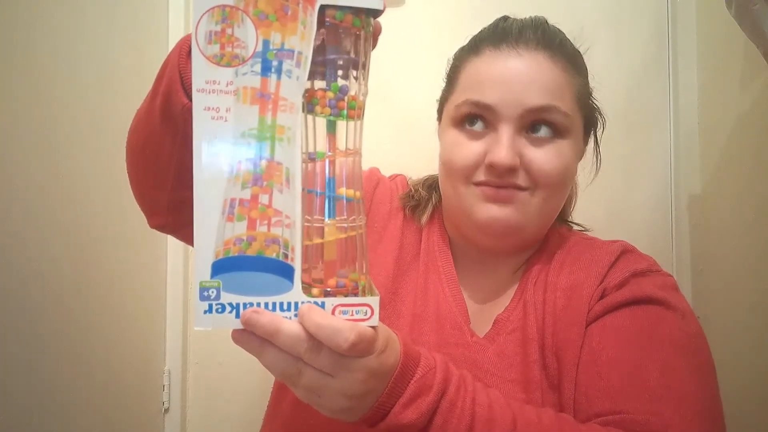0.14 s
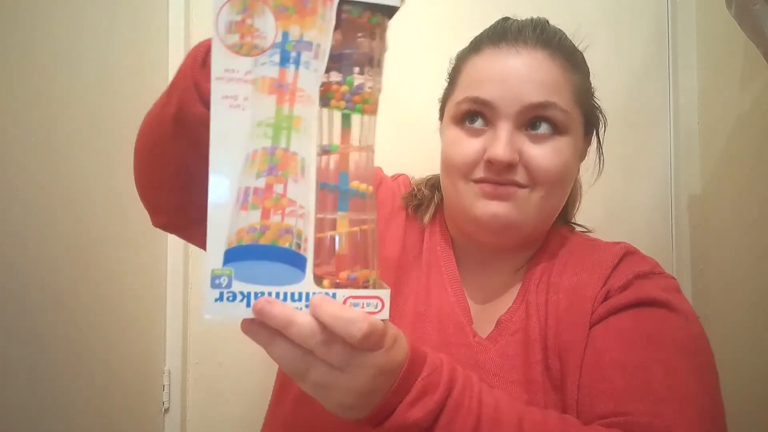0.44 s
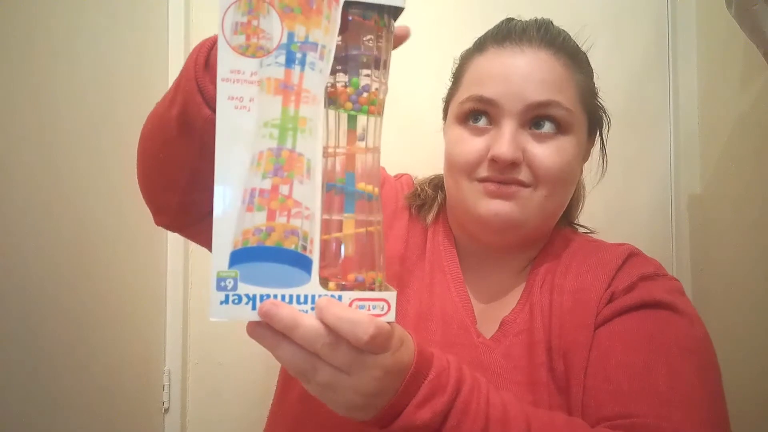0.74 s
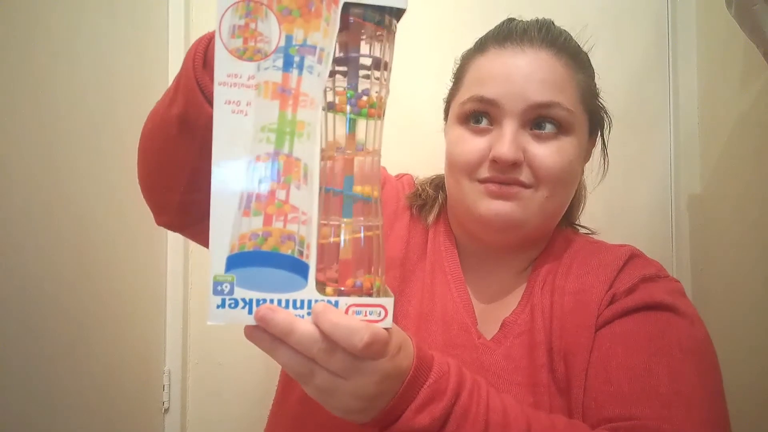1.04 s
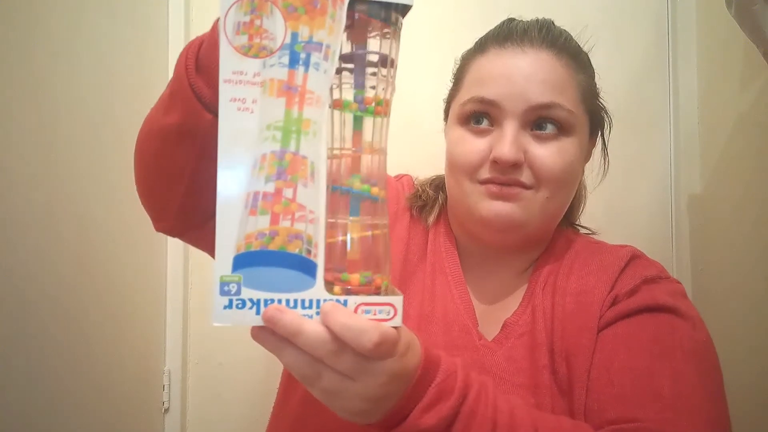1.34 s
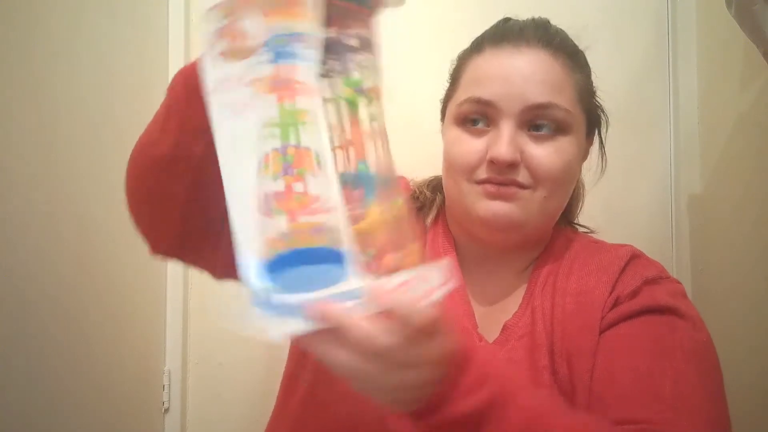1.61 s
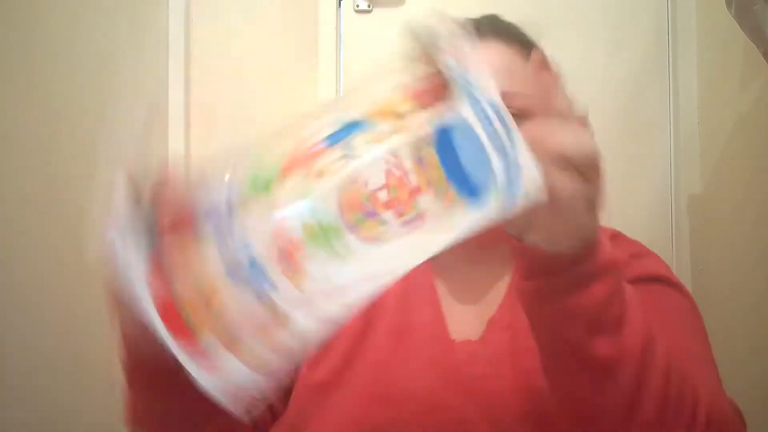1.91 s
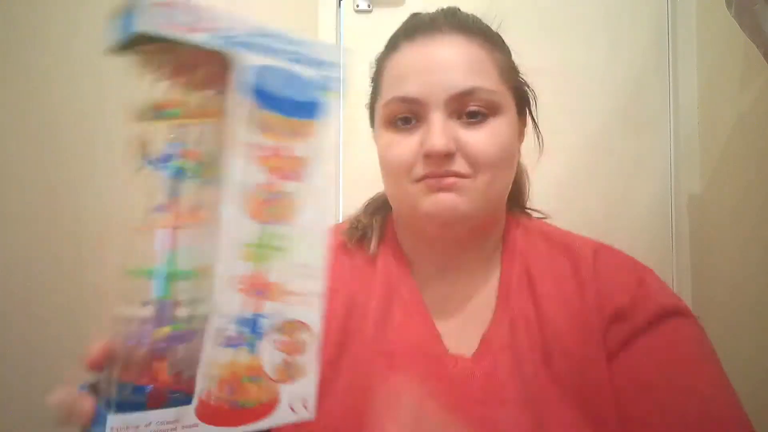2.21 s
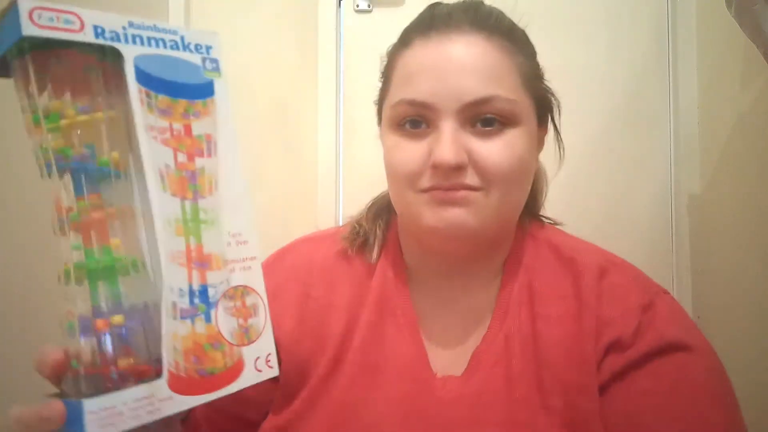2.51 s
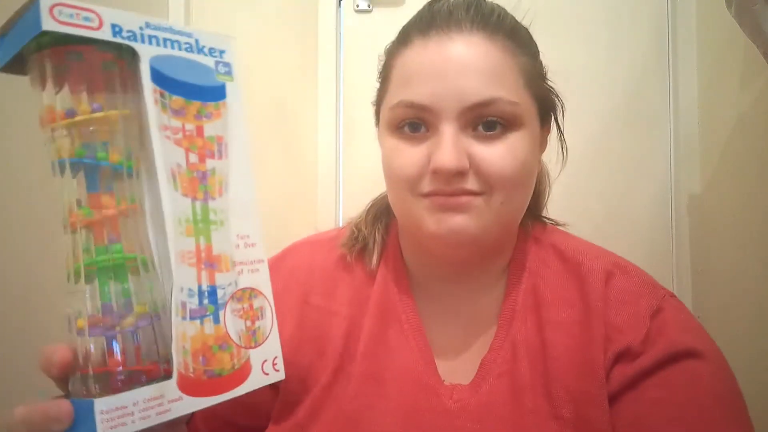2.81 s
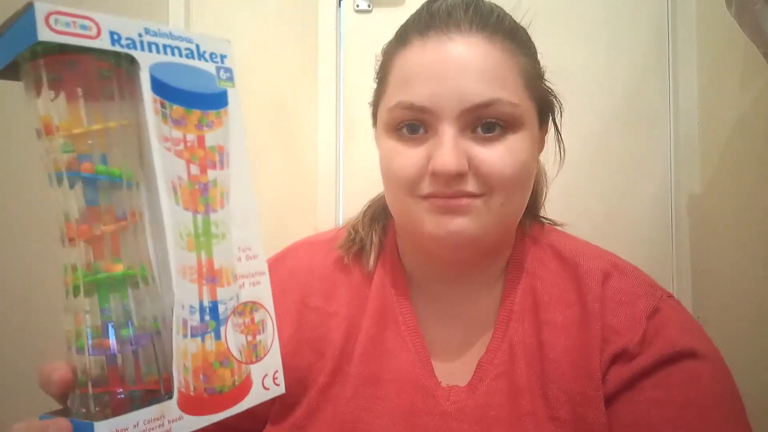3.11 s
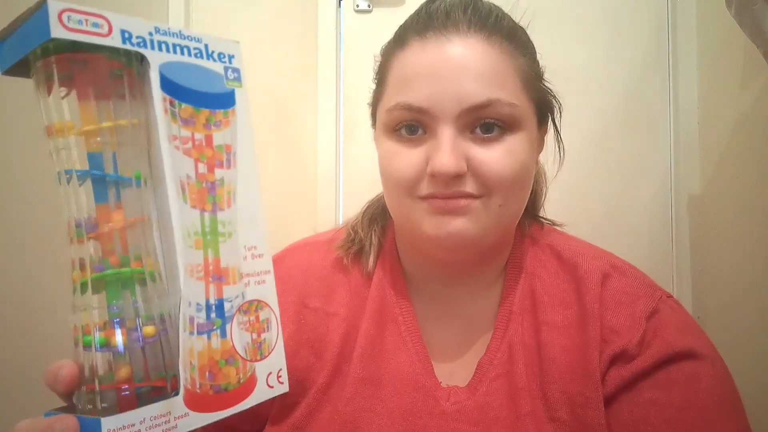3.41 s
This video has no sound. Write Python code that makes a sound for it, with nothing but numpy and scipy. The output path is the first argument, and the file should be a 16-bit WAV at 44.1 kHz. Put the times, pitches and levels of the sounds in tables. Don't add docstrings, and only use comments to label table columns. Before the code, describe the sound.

A bead-filled rain tube rattles close by, trickling, then pouring brightly after being turned over

```python
import sys
import numpy as np
from scipy import signal
from scipy.fft import rfft, irfft
from scipy.io import wavfile

SR = 44100
rng = np.random.default_rng(int(sys.argv[2]) if len(sys.argv) > 2 else 0)


def transcribe(signal):
    frames = np.atleast_2d(signal).T
    limited = np.clip(frames, -1, 1)
    pcm = np.round(limited * 32767).astype(np.int16)
    wavfile.write(sys.argv[1], SR, pcm)


def voltage_ratio(decibels):
    exponent = np.asarray(decibels, float) / 20
    return 10 ** exponent


N = 156555
TIME_S = np.arange(N) / SR


def rms_one(x):
    return x / np.sqrt(np.mean(x ** 2) + 1e-20)


def at_hz(points, hz):
    table_hz, table_db = np.array(points).T
    return np.interp(np.log(hz), np.log(table_hz), table_db)


def drift(rate_hz):
    r = np.exp(-40 * np.pi * rate_hz / SR)
    noise = rng.standard_normal(N // 20 + 2002)
    slow = signal.lfilter([1], [1, -2 * r, r * r], noise)[2000:]
    return np.interp(np.arange(N) / 20, np.arange(len(slow)), rms_one(slow))


def coloured(spectrum):
    hz = np.maximum(np.fft.rfftfreq(N, 1 / SR), 1)
    shape = voltage_ratio(at_hz(spectrum, hz)) * (hz > 15)
    return rms_one(irfft(rfft(rng.standard_normal(N)) * shape, N))


def ring(clicks, hz, t60_s):
    r, w = voltage_ratio(-60 / (t60_s * SR)), 2 * np.pi * min(hz, .45 * SR) / SR
    return signal.lfilter([0, np.sin(w)], [1, -2 * r * np.cos(w), r * r], clicks + 1e-18)


def even_ring(clicks, hz, width_hz):
    r, w = np.exp(-np.pi * width_hz / SR), 2 * np.pi * min(hz, .45 * SR) / SR
    stage = [(1 - r * r) / 2, 0, -(1 - r * r) / 2, 1, -2 * r * np.cos(w), r * r]
    return signal.sosfilt([stage, stage], clicks + 1e-18)


def strikes(rows, extra_db):
    s, db = np.transpose(rows)
    out = np.zeros(N)
    out[(s * SR).astype(int)] = voltage_ratio(db + extra_db)
    return out


def grains(mean_rate, clump, spread_db):
    mean_rate = np.clip(mean_rate, 150, SR / 2)
    size_db = spread_db * np.minimum(rng.exponential(1, N), 4)
    sizes = rms_one(voltage_ratio(size_db) * rng.choice([-1, 1], N))
    lands = rng.random(N) < mean_rate * clump / SR
    return lands * sizes * np.sqrt(SR / mean_rate)


# frequency in Hz, density in dB per Hz.
RUMBLE_SPECTRUM = [(11, -33), (18, -3), (45, 0), (76, -7), (232, -14), (300, -18.5), (390, -71),
                   (660, -120)]
# frequency in Hz, density in dB per Hz.
HISS_SPECTRUM = [(180, -47), (300, -3.5), (439, -3), (517, -13.5), (953, -9.5), (1220, -16), (2740, -18),
                 (2980, -22), (15500, -34)]


def room_floor():
    rumble = voltage_ratio(-48 + 2.5 * drift(4)) * coloured(RUMBLE_SPECTRUM)
    return rumble + voltage_ratio(-52) * coloured(HISS_SPECTRUM)


def room_echo(x):
    t60_s, treble_t60_s, treble_hz, delay_s = .3, .25, 8700, .003
    t = np.arange(SR // 2) / SR
    lowpass = signal.butter(2, treble_hz, fs=SR, output="sos")
    out = 0
    for k in range(10):
        noise = rng.standard_normal(len(t)) * np.clip(t / delay_s - 1, 0, 1)
        low = signal.sosfilt(lowpass, noise)
        tail = low * voltage_ratio(-60 * t / t60_s) + (noise - low) * voltage_ratio(-60 * t / treble_t60_s)
        tail = tail / np.sqrt(np.sum(tail ** 2))
        share = np.cos(np.pi / 2 * np.clip(np.arange(N) / N * 9 - k, -1, 1))
        out = out + signal.fftconvolve(x * share, tail)[:N]
    return out


def knock_burst():
    start_s, length_s = .34, .02
    swell = np.exp(-((TIME_S - start_s) / length_s) ** 2)
    return voltage_ratio(-40) * even_ring(swell * rng.standard_normal(N), 1500, 3400)


def carton_thump():
    return ring(strikes([(2.325, -24.5)], 0), 60, .054)


# start in seconds, peak in dB, own pitch in Hz.
HAND_KNOCKS = [
    (.13, -36.5, 760),
    (.335, -43.5, 910),
    (.408, -56, 800),
    (.44, -34, 470),
    (.696, -25, 490),
    (1.001, -32.5, 800),
    (1.053, -30, 800),
    (1.199, -31, 776),
    (1.632, -25, 382),
    (2.024, -32.5, 770),
]
# frequency in Hz, level in dB, width in Hz.
CARTON_MODES = [
    (470, -19, 73),
    (704, 0.5, 270),
    (994, 15.5, 250),
    (1232, 10.5, 430),
]


def carton_knocks():
    knock_db, own_pitch_db, scatter_db = 23, 12, 2.6
    times = [row[:2] for row in HAND_KNOCKS]
    out = np.zeros(N)
    for hz, db, width_hz in CARTON_MODES:
        uneven = voltage_ratio(rng.normal(0, scatter_db, N))
        out += even_ring(strikes(times, knock_db + db) * uneven, hz, width_hz)
    for s, db, hz in HAND_KNOCKS:
        out += even_ring(strikes([(s, db)], knock_db + own_pitch_db), hz, 80)
    return out


# start in seconds, peak in dB, ring in Hz.
HARD_LANDINGS = [(0.0644, -22, 6270), (0.0827, -12, 4600), (0.1474, -25, 4600), (0.1574, -24, 4570),
                 (0.378, -31, 4830), (0.4045, -17, 4880), (0.4294, -17, 4820), (0.4786, -12.5, 5060),
                 (0.4874, -13, 4900), (0.5074, -15, 4670), (0.541, -9.5, 4840), (0.5524, -17, 5140),
                 (0.5634, -18, 4700), (0.629, -10, 4880), (0.6749, -9, 7370), (0.7264, -11, 4700),
                 (0.7657, -18, 4960), (0.7844, -10, 7140), (0.8101, -8, 6900), (0.8924, -10, 7500),
                 (0.9263, -8, 5000), (1.012, -9, 5080), (1.0244, -9, 5310), (1.0514, -6, 6600),
                 (1.0834, -17, 4910), (1.1164, -4.5, 4780), (1.1394, -11, 5000), (1.3194, -7, 4810),
                 (1.6594, -10, 5800), (2.0453, -1.5, 5370)]


def hard_beads():
    bounce_s, bounce_loss_db, hard_db, click_db = .0045, 4, 29, -34
    width_hz, partner = 230, 1.035
    bounce = np.arange(3)
    out = np.zeros(N)
    for s, db, hz in HARD_LANDINGS:
        gaps = rng.uniform(.6, 1.0, 3)
        push = np.zeros(SR // 20)
        push[(bounce_s * SR * bounce * gaps).astype(int)] = voltage_ratio(db + hard_db - bounce_loss_db * bounce)
        wall = even_ring(push, hz, width_hz) + even_ring(push, hz * partner, width_hz)
        click = voltage_ratio(click_db) * even_ring(push, 8000, 9000)
        i = int(s * SR)
        out[i:i + len(push)] += wall + click
    return out


# time in seconds, flow level in dB,
# free ticks against wall hits in dB, carton ring left by the grip in dB.
LAST_FALL = [
    (0.0, -24.5, -5.5, -3),
    (0.042, -47, 5, -2),
    (0.092, -22, 1.5, -9),
    (0.144, -44, 1, 0),
    (0.15, -35, 7.5, -5),
    (0.176, -44, 7, 6),
    (0.18, -87, -12, 0),
    (0.37, -51, -2, -6),
]
# time in seconds, flow level in dB,
# free ticks against wall hits in dB, carton ring left by the grip in dB.
POUR_FLOW = [(0.37, -59, -4, -9), (0.4, -32, -6, -0.5), (0.57, -27, 3, 0), (0.59, -26.5, -1, 1.5),
             (0.82, -23.5, 0.5, 2.5), (1.64, -18, -1, 4), (1.66, -15.5, 0, -5), (1.74, -20, 0.5, 1),
             (1.88, -18, 2, -4.5), (1.92, -24.5, 0.5, 3), (2.06, -16, -1.5, 3.5), (2.35, -11.5, 4, -2.5),
             (2.72, -13.5, 3, 3), (2.74, -11.5, 2, 2), (3.55, -14.5, 2.5, 0.5)]


def bead_flow():
    s, *controls = np.transpose(LAST_FALL + POUR_FLOW)
    flow_db, free_db, grip_db = [np.interp(TIME_S, s, c) for c in controls]
    flow_db = flow_db + 1 * drift(8)
    more = voltage_ratio(.6 * (flow_db + 18.5))
    clump = voltage_ratio(1.8 * drift(50))
    free_ticks = grains(12000 * more, clump, 3) * voltage_ratio(free_db + flow_db)
    wall_hits = grains(1500 * more, clump, 1) * voltage_ratio(flow_db)
    return wall_hits, free_ticks, grip_db


def turned_over():
    turn_s, turn_length_s = 2.2, .25
    return np.clip((TIME_S - turn_s) / turn_length_s + .5, 0, 1)


def shaken_cap(wall_hits):
    shaken = wall_hits * (TIME_S > .08) * (TIME_S < .3)
    return voltage_ratio(8) * even_ring(shaken, 11600, 675)


# frequency in Hz, density in dB per Hz.
TICK_COLOUR_BEFORE = [(150, -55), (250, -86), (526, -10.5), (782, -20), (1250, -14.5), (2670, -7),
                      (4800, 1), (11200, 1.5), (15500, -22)]
# frequency in Hz, density in dB per Hz.
TICK_COLOUR_AFTER = [(150, -65), (250, -39.5), (769, -12.5), (1510, -15), (1990, -26), (2710, -10.5),
                     (5050, 0.5), (11200, -2), (15500, -20.5)]


def bare_ticks(free_ticks, turned):
    tick_q = 6.06
    dealt = rng.integers(0, 12, N)
    out = 0
    for k, hz in enumerate(np.geomspace(300, 15000, num=36)):
        before_db, after_db = at_hz(TICK_COLOUR_BEFORE, hz), at_hz(TICK_COLOUR_AFTER, hz)
        colour_db = before_db * (1 - turned) + after_db * turned
        out = out + even_ring(free_ticks * (dealt == k % 12) * voltage_ratio(colour_db), hz, hz / tick_q)
    return voltage_ratio(10.5) * out


# frequency in Hz, width in Hz,
# level in dB before the turn, level in dB after it.
TUBE_MODES = [(385, 50, -28, -22), (790, 71, -3, -9), (960, 180, -10, -12), (1090, 30, -35, -8),
              (1750, 113, -10, -6), (2002, 186, -9.5, -4), (2370, 150, -11, -9.5), (3233, 140, -4.5, -6.5),
              (4246, 295, -3, -0.5), (4780, 323, 5, 1.5), (5240, 405, 2, 2), (6340, 740, -2.5, -15),
              (7043, 880, 0, -7), (11770, 100, -33, -17)]


def tube_ring(wall_hits, grip_db, turned):
    scatter_db, patch_db, patch_hz, carton_top_hz = 4, 1, 7.6, 1400
    out = 0
    for hz, width_hz, before_db, after_db in TUBE_MODES:
        own = voltage_ratio(scatter_db * rng.standard_normal(N)) * rng.choice([-1, 1], N)
        level_db = before_db + (after_db - before_db) * turned + patch_db * drift(patch_hz)
        level_db = level_db + grip_db * (hz < carton_top_hz)
        out = out + even_ring(wall_hits * own * voltage_ratio(level_db), hz, 1.4 * width_hz)
    return voltage_ratio(2) * out


def beads():
    wall_hits, free_ticks, grip_db = bead_flow()
    turned = turned_over()
    flow = tube_ring(wall_hits, grip_db, turned) + bare_ticks(free_ticks, turned)
    return flow + shaken_cap(wall_hits) + hard_beads()


def scene():
    toy = beads() + carton_thump() + carton_knocks() + knock_burst()
    mic_top = signal.butter(3, 12740, fs=SR, output="sos")
    heard = signal.sosfilt(mic_top, toy + voltage_ratio(-5) * room_echo(toy))
    return (heard + room_floor())[None]


def roll_off(x):
    return signal.sosfilt(signal.butter(12, 15690, fs=SR, output="sos"), x)


def record(dry):
    clip, knee = .92, 4
    rounded = dry / (1 + np.abs(dry / clip) ** knee) ** (1 / knee)
    return roll_off(rounded)


dry = scene()
out = record(dry)
transcribe(out)
```